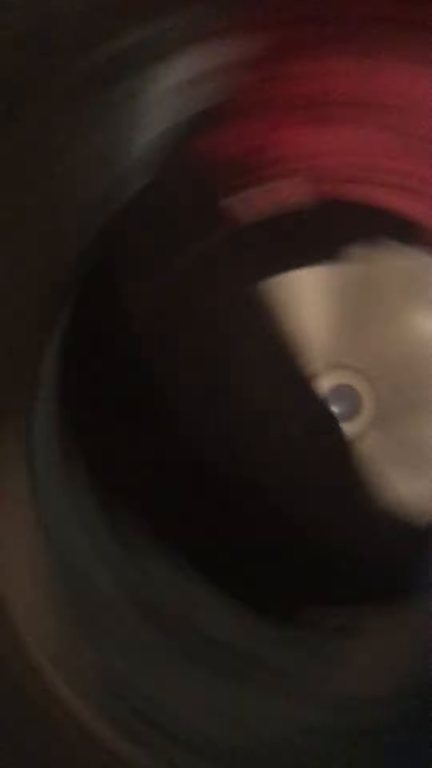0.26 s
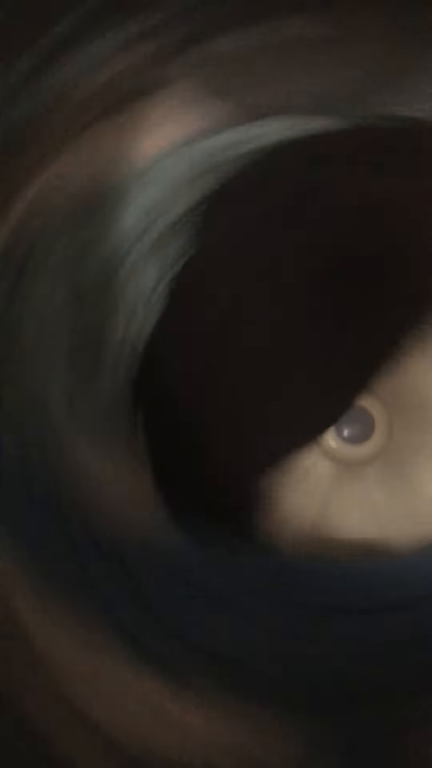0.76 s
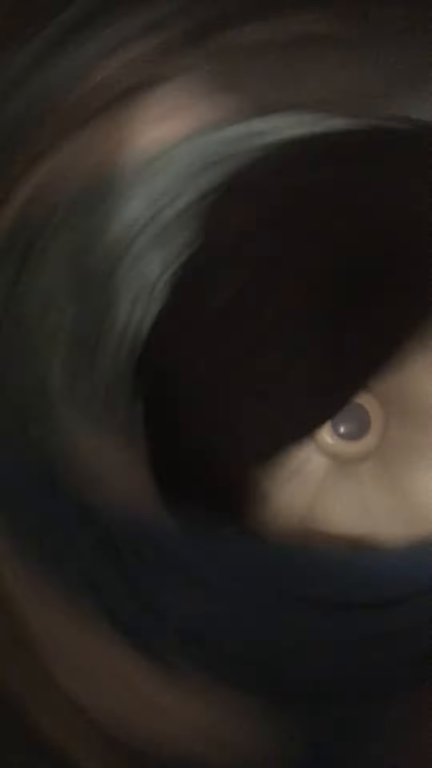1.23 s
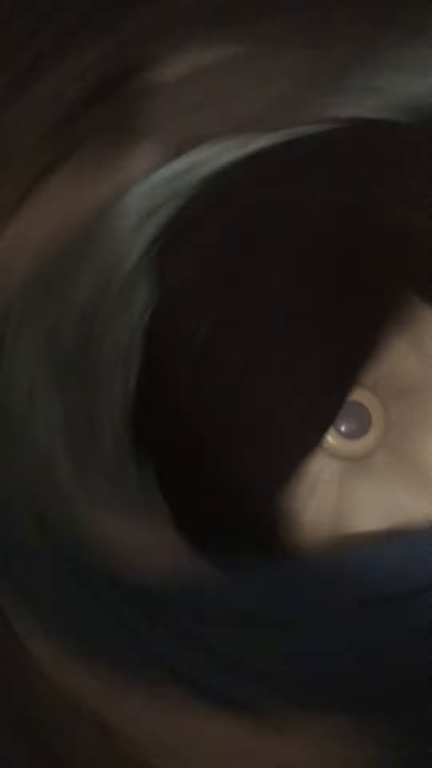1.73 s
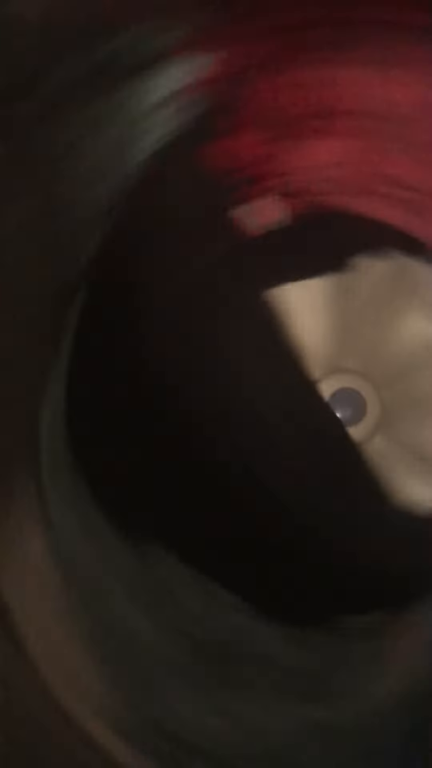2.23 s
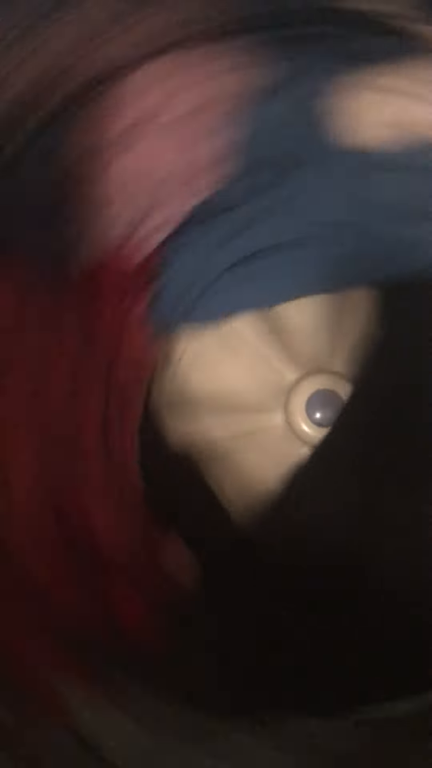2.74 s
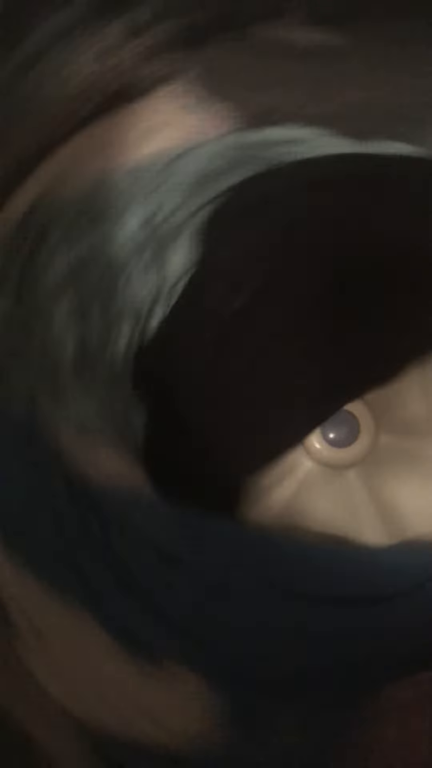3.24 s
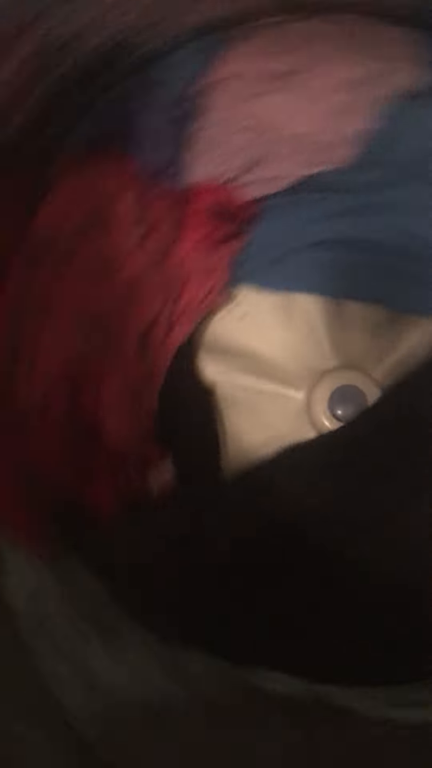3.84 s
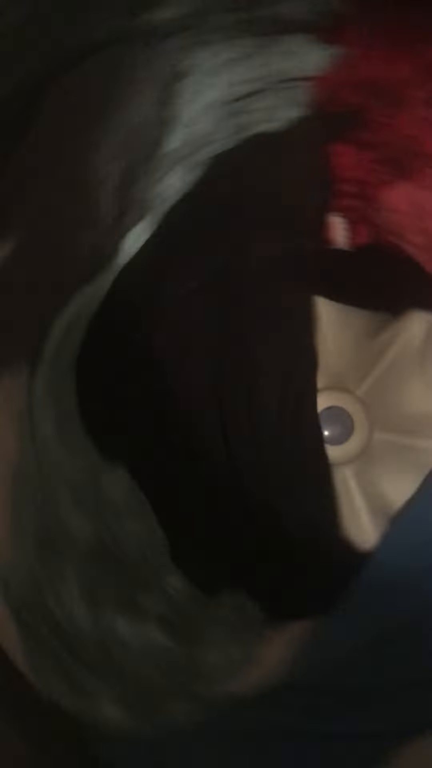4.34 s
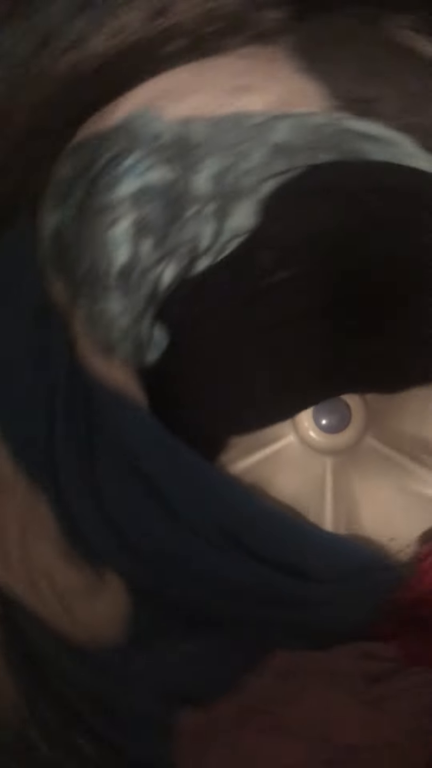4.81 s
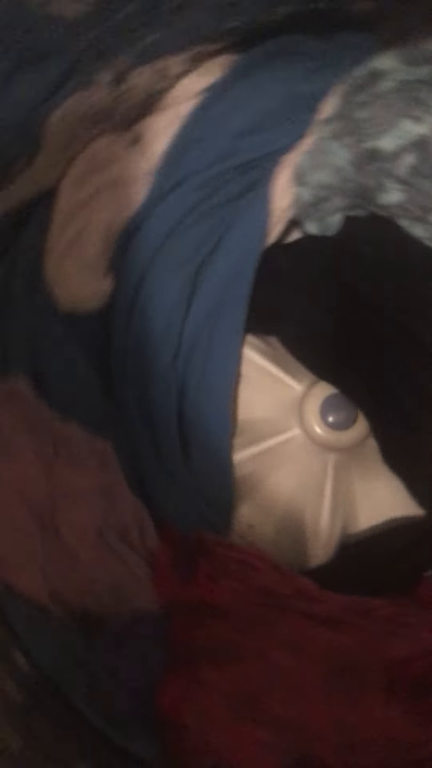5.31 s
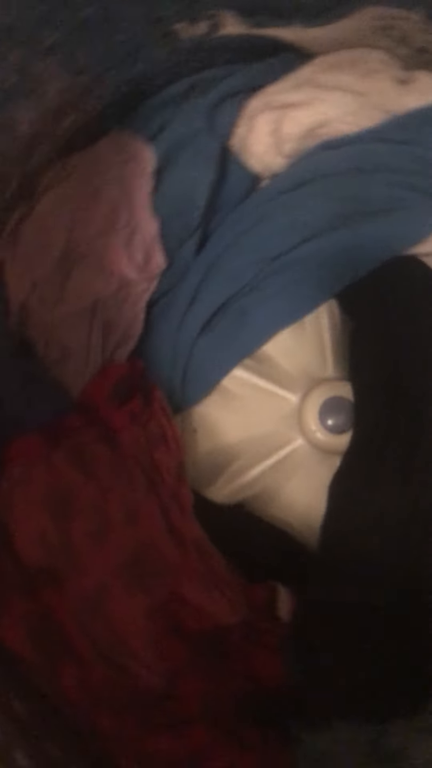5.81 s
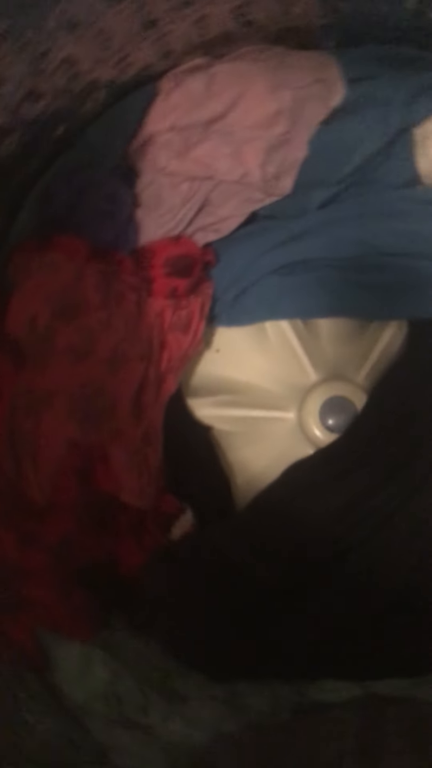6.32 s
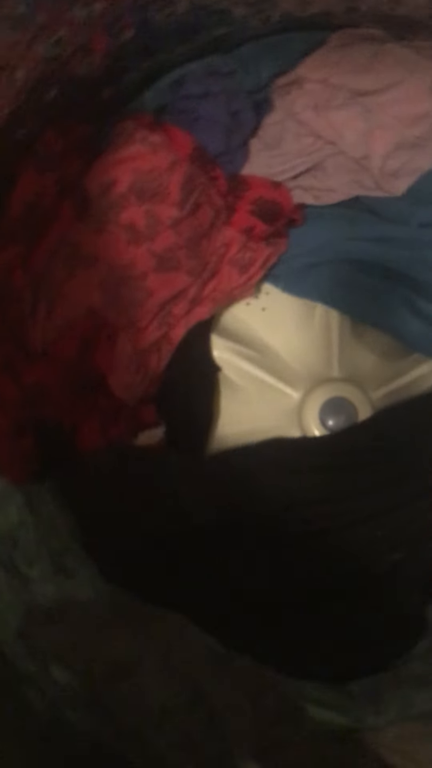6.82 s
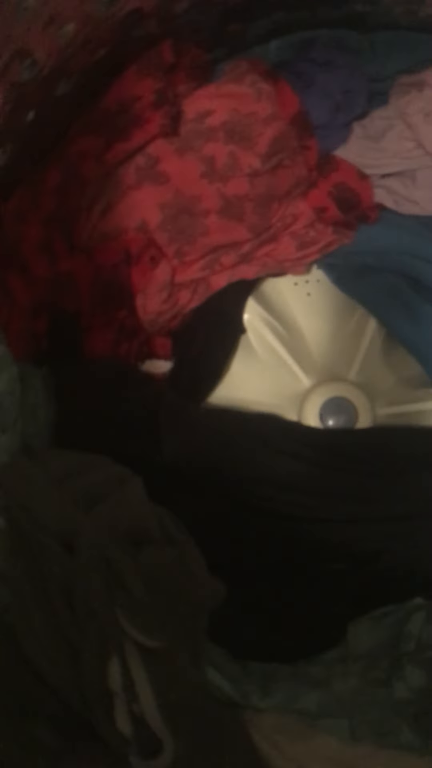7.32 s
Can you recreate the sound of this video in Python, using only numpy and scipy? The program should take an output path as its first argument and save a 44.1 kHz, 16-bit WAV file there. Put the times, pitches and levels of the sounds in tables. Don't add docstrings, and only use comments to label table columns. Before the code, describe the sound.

Close to a washing machine's door, the shaking tub rumbles and lurches while the load thuds on the cabinet and zips and buttons clatter on steel. The noise falls away within two seconds, a low groan sinks in pitch, and light bumps and taps follow. Finally cloth rustles and snaps faintly over a fast, soft motor knocking, mains hum and microphone hiss.

```python
import sys
import numpy as np
from scipy import signal
from scipy.io import wavfile
from scipy.ndimage import uniform_filter1d

SR = 44100
rng = np.random.default_rng(int(sys.argv[2]) if len(sys.argv) > 2 else 0)


def int16_out(signal):
    q = np.round(np.clip(np.atleast_2d(signal).T, -1, 1) * 32767)
    wavfile.write(sys.argv[1], SR, q.astype(np.int16))


def voltage_ratio(decibels):
    exponent = np.asarray(decibels, float) / 20
    return 10 ** exponent


N = 333396
T = np.arange(N) / SR

# (time [s], level [dB])
SHAKE_LEVEL = [(0, -40), (.2, -39.5), (.35, -34.5), (.55, -39), (.75, -35), (1.02, -40.5), (1.18, -38),
               (1.42, -44.5), (1.65, -48), (2.1, -47.5), (2.3, -50), (2.7, -50), (3.1, -55), (3.68, -48),
               (3.95, -56.5), (4.85, -56.5), (5.1, -75), (5.6, -85)]
SHAKE_MID_DB = -45
# (frequency [Hz], density [dB per Hz])
SWAY_COLOUR = [(25, -38), (45, -13), (58, -9), (66, 34), (76, -14), (90, 0), (105, -20)]
RUMBLE_COLOUR = [(53, -61), (90, -1.5), (118, -10.5), (179, -4), (290, -12), (592, -23.5), (739, -37),
                 (1000, -29), (1300, -57), (2200, -120)]
SWISH_COLOUR = [(470, -32), (800, -0.5), (1150, 1), (1310, -9.5), (1470, -5), (2040, -7), (2560, -10.5),
                (3010, -8), (5000, -26.5), (7000, -37.5), (9100, -70), (15400, -120)]
# (frequency [Hz], level [dB], decay time t60 [s])
CABINET_MODES = [(147.1, -0.5, 0.099), (180.6, -0.5, 0.18), (244.2, -5.5, 0.15), (273.7, -5, 0.17),
                 (326.9, 7.5, 0.076), (424.6, 9, 0.049), (472, 3, 0.073), (525, 14.5, 0.036),
                 (613, 11, 0.065), (666, 10, 0.058), (833, 7, 0.068)]
DRUM_MODES = [(923, 34.5, 0.008), (1180, 8, 0.11), (1450, 0.5, 0.064), (1450, 4.5, 0.016),
              (1935, -7, 0.025), (2000, 6, 0.015), (2320, -19, 0.02), (2910, -11.5, 0.032),
              (3220, -5, 0.0063), (3520, -20, 0.027), (3550, -23, 0.015), (4850, -16, 0.02),
              (6500, -21, .05)]
# (time of peak [s], level [dB], frequency [Hz], length [s])
LURCHES = [(0.07, -51, 65, 0.055), (0.277, -55, 70.5, 0.073), (0.254, -35, 130.6, 0.096),
           (0.418, -42, 64.5, 0.059), (0.428, -38.5, 120, 0.095), (0.54, -39, 64, 0.034),
           (0.59, -37.5, 128.6, 0.11), (0.633, -36, 67.3, 0.046), (0.732, -37.5, 67, 0.03),
           (0.84, -45.5, 63.4, 0.089), (0.954, -40, 68, 0.031), (1.123, -34, 126.5, 0.078),
           (1.168, -37.5, 67.7, .11), (1.405, -43, 62.3, 0.052), (1.556, -45.5, 74.7, 0.046),
           (1.745, -51, 70.4, 0.037), (2.2, -61, 66.2, 0.09), (2.743, -61, 75.7, 0.81),
           (3.258, -53, 119.9, 0.059), (3.45, -58, 67, 0.11), (3.69, -64, 65.3, .08),
           (3.913, -58, 119.6, 0.19), (4.914, -62, 66.5, .12), (5.41, -58.5, 120.6, 0.23)]
# (time [s], frequency [Hz], level [dB])
GROAN = [
    (1.75, 129.7, -68),
    (1.89, 127.4, -47),
    (2.03, 120.8, -54),
    (2.16, 117.4, -44.5),
    (2.32, 113.7, -54),
    (2.48, 106, -53),
    (2.6, 110, -64),
]
# (time [s], peak level [dB], centre frequency [Hz], contact length [s])
THUDS = [(0.009, -40.5, 170, 0.0045), (0.142, -27, 221, 0.011), (0.223, -20.5, 151, 0.025),
         (0.254, -23.5, 283, 0.029), (0.361, -43, 172, 0.015), (0.409, -28.5, 189, 0.016),
         (0.459, -24, 276, 0.0067), (0.579, -34, 144, 0.0061), (0.619, -25.5, 180, 0.024),
         (0.919, -29, 194, 0.0042), (1.069, -31, 160, 0.011), (1.103, -34, 180, 0.036),
         (1.328, -31.5, 172, 0.045), (1.347, -35, 192, 0.0057), (1.605, -37, 344, 0.0055),
         (1.719, -42, 204, 0.012)]
SLAM = [
    (.732, -26.5, 540, 0.0035),
    (0.7413, -18, 200, 0.0039),
]
BUMPS = [(2.029, -37.5, 704, 0.036), (2.128, -33, 517, 0.012), (2.359, -38.5, 360, 0.01),
         (2.459, -37.5, 108, 0.0077), (2.711, -37, 183, 0.021), (2.791, -35, 530, 0.016),
         (2.878, -36.5, 556, 0.0062), (3.095, -39, 363, 0.016), (3.292, -37.5, 650, 0.0066),
         (3.445, -36, 468, 0.0048), (3.516, -41, 196, 0.0096), (3.628, -32.5, 490, 0.02),
         (3.74, -33.5, 610, 0.012), (4.06, -35, 386, 0.0082), (4.172, -37.5, 474, 0.019),
         (4.28, -38.5, 627, 0.02), (4.573, -39.5, 465, 0.013), (4.736, -38.5, 360, 0.0097),
         (4.778, -41.5, 230, 0.028), (4.847, -43.5, 177, 0.023), (5.322, -40.5, 280, 0.028),
         (5.369, -45, 173, 0.019)]
THUD_SPREAD_HZ, BUMP_SPREAD_HZ = 213, 194
# (time [s], peak level [dB], frequency [Hz], decay time t60 [s])
BOOMS = [(.145, -34, 598, 0.15), (.225, -31.5, 430.8, 0.39), (.255, -30, 173.3, 0.17),
         (0.361, -29, 172.6, .15), (0.409, -35, 279, 0.37), (0.589, -35, 180, .2), (.66, -30.5, 180, 0.12),
         (0.691, -34, 247.5, 0.22), (0.739, -24, 167, 0.094), (.742, -29, 325.4, 0.18),
         (.83, -34.5, 159, .15), (0.901, -33, 179.7, .2), (1.059, -38.5, 250, 0.21),
         (1.103, -33, 525, 0.077), (1.115, -34.5, 638, 0.14), (1.1, -28, 178.8, 0.49),
         (1.2, -40.5, 174.6, 0.64), (1.311, -38.5, 444, 0.19), (1.328, -26.5, 180.8, 0.19),
         (1.335, -31.5, 591, 0.04), (1.559, -40, 203, 0.17), (3.446, -34, 476, 0.075),
         (3.628, -39, 537, 0.12), (4.172, -38.5, 490, 0.1), (4.574, -36.5, 478, 0.037),
         (3.65, -45, 306, 0.44), (5.33, -47.5, 169.4, 0.55)]
PINGS = [
    (.437, -41.5, 3030, 0.083),
    (0.94, -43, 1450, .04),
    (.6, -47.5, 3690, 0.03),
]
# (time [s], peak level [dB], centre frequency [Hz], contact length [s], splash peak level [dB])
CLACKS = [
    (0.2228, -27.5, 2080, 0.024, -47),
    (1.086, -42.5, 3860, 0.008, -72),
    (1.196, -48, 2660, 0.028, -69),
    (1.288, -59, 2160, 0.0073, -57),
    (1.772, -35.5, 1430, 0.026, -63),
    (1.886, -41.5, 2580, 0.03, -56),
    (1.912, -40, 2900, 0.0034, -59),
    (2.013, -28, 1500, 0.019, -48.5),
]
# (time [s], peak level [dB], centre frequency [Hz], contact length [s])
RATTLES = [(0.136, -33.5, 1170, 0.035), (0.209, -39, 1760, 0.0035), (0.263, -41.5, 3160, 0.06),
           (0.409, -42, 1180, 0.0063), (0.444, -42, 1000, 0.095), (0.595, -33.5, 1160, 0.01),
           (0.695, -50, 2900, 0.014), (0.894, -44, 1220, 0.0095), (1.069, -41.5, 1450, 0.012),
           (1.098, -35.5, 1500, 0.0074), (1.129, -30, 960, 0.0071), (1.241, -36, 1560, 0.025),
           (1.322, -33, 1200, 0.0047), (1.453, -40.5, 1960, 0.02), (1.713, -49, 950, 0.0033),
           (2.024, -29, 1640, 0.016), (2.113, -38.5, 1190, 0.025), (2.348, -48.5, 1950, 0.028),
           (3.089, -48.5, 1760, 0.022), (3.513, -48, 2680, 0.018)]
JINGLES = [(0.235, -33, 3140, 0.0023), (0.38, -52, 2560, 0.0089), (0.438, -52, 3030, 0.0035),
           (0.565, -62, 3120, 0.018), (0.612, -45, 3230, 0.007), (0.667, -49, 2800, 0.021),
           (0.725, -44, 1420, 0.015), (0.864, -49, 2790, 0.014), (1.022, -45.5, 3050, 0.01),
           (1.024, -38, 1450, 0.0071), (1.13, -41.5, 2840, 0.0019), (1.253, -50, 3100, 0.013),
           (1.306, -49, 2460, 0.006), (1.518, -51, 1860, 0.02), (1.876, -54, 4200, 0.01),
           (2.038, -43, 2400, 0.031), (3.988, -51, 1820, .007)]
# (time [s], peak level [dB], contact length [s])
TAPS = [(2.716, -48, 0.01), (2.79, -49, 0.005), (2.884, -65, 0.007), (3.027, -57, 0.0086),
        (3.286, -55, 0.006), (3.447, -42, 0.0036), (3.626, -42.5, 0.023), (3.737, -50, 0.0091),
        (3.942, -50.5, 0.013), (4.066, -46.5, 0.0081), (4.168, -50, 0.015), (4.284, -50, 0.0065),
        (4.572, -56, 0.0059), (4.734, -47, 0.0034), (4.782, -43, 0.0031), (5.324, -49, 0.0086)]
# (frequency [Hz], level [dB], decay time t60 [s])
WALL_MODES = [(930, -5, 0.071), (1125, -8.5, 0.098), (1450, -12.5, 0.068), (1667, -13, 0.053),
              (1845, 1.5, 0.011), (2075, -4, 0.016), (2439, -37, 0.019), (2995, -5, 0.025),
              (3246, -2.5, 0.015), (3550, -6, 0.021), (4520, -17, 0.012)]
# (time [s], peak level [dB], centre frequency [Hz], range [octaves])
STRIKES = [(.053, -47, 970, 0.95), (0.136, -28, 2000, 0.59), (0.138, -26.5, 1000, 1),
           (0.217, -30.5, 2500, 1), (0.227, -17, 3300, 0.63), (0.23, -14.5, 1990, 1),
           (0.238, -35, 3020, 0.43), (.25, -40, 3060, 0.4), (0.259, -44, 3000, 0.45),
           (0.266, -36, 1950, 0.33), (0.283, -41, 3200, .5), (0.409, -51, 3020, 0.5),
           (0.439, -51, 2930, 0.11), (0.446, -37.5, 1010, 1), (0.465, -50, 1790, 0.36),
           (.51, -51, 2000, 0.33), (0.549, -50, 910, 0.24), (0.579, -40, 1800, 0.5),
           (0.598, -28, 1550, 0.52), (0.611, -31.5, 1060, 0.41), (0.616, -40, 2980, 0.41),
           (.676, -57, 2900, .2), (0.702, -48, 3100, .4), (.889, -49, 980, 0.45), (0.909, -46, 2130, 0.53),
           (1.029, -39, 1450, 0.14), (1.038, -45, 1450, 0.13), (1.064, -36.5, 1520, 0.51),
           (1.103, -36, 890, 0.39), (1.134, -39, 2570, 1), (1.243, -41, 1320, 0.22), (1.262, -52, 2520, .7),
           (1.323, -50, 930, 0.48), (1.331, -42, 2440, 0.14), (1.4587, -50, 3560, .5),
           (1.466, -40.5, 1660, 0.32), (1.781, -37, 840, 0.37), (1.9005, -48, 2000, 0.93),
           (1.908, -45, 2500, 0.96), (2.024, -39, 1860, .8), (2.031, -28, 1575, 0.16),
           (2.039, -33, 1550, 0.33), (2.788, -46, 1100, 0.65), (2.881, -52, 1020, 0.55),
           (3.298, -47.5, 980, 0.85), (3.443, -42, 1120, 0.53), (3.629, -42.5, 1000, 0.35),
           (3.742, -54, 1900, .4), (4.065, -58, 1110, 1), (4.285, -45, 1100, 0.97),
           (4.777, -61, 1800, 0.72), (5.325, -49.5, 1050, 0.36),
           (2.3545, -49, 1930, 0.59), (2.7085, -52, 1020, 0.6), (2.9002, -70, 1070, 0.66),
                  (3.0344, -49, 1150, 1), (3.0913, -49, 1900, 0.48), (3.156, -52, 1100, 0.68),
                  (3.2923, -55, 1140, 0.6), (3.441, -58, 1180, 0.6), (3.514, -50, 3030, 0.6),
                  (3.6264, -55, 1110, 0.73), (3.74, -49, 1150, 0.55), (3.9005, -52, 2910, 0.6),
                  (3.9194, -56, 1060, 0.6), (3.9422, -52, 1090, 0.72), (3.9948, -53, 1790, 0.33),
                  (4.0227, -51, 2140, 0.34), (4.0616, -49, 1220, 0.65), (4.2797, -54, 1150, 0.6),
                  (4.706, -58, 2940, 0.4), (4.732, -59, 1920, 0.4), (4.7772, -46, 1100, 0.49),
                  (4.9007, -56, 3200, 0.3), (4.918, -55, 2800, .3), (4.685, -61, 2290, .2),
                  (5.3234, -58, 1100, 0.6)]
# (time [s], peak level [dB])
CLOTH_TICKS = [
    (4.9453, -40),
    (4.9478, -43),
    (4.9558, -40),
    (4.9587, -41),
]
# (time [s], peak level [dB], frequency [Hz])
CRACKLES = [
    (5.322, -47, 2570),
    (5.7004, -51, 3600),
    (5.9094, -52, 3000),
    (6.139, -50, 3100),
    (6.2077, -47, 3030),
    (6.345, -50, 3000),
    (6.651, -49, 3080),
    (6.701, -43, 3020),
    (6.7537, -53, 3150),
    (7.2655, -52, 3220),
]
# (time [s], peak level [dB], length [s])
CRACK = (0.21, -50.5, 0.014)
# (time [s], level [dB], fade rate [dB per s])
PEELS = [
    (5.2, -73.5, 29),
    (5.7, -69, 25),
    (6.68, -75, 148),
    (6.84, -66, 290),
    (6.98, -73, 47),
]
# (frequency [Hz], density [dB per Hz])
CLOTH_COLOUR = [(880, -51), (1500, -8), (1820, -19), (2240, -4), (2840, -9.5), (3080, -5.5), (5000, -18),
                (6500, -42), (11000, -120)]
# (frequency [Hz], level [dB], decay time t60 [s], first movement [+1 out, -1 in])
KNOCK_MODES = [(217.2, -4, 0.092, -1), (267.6, -28, 0.73, -1), (319.2, -4.5, 0.064, -1),
               (344.5, -9.5, 0.11, -1), (418, -4, 0.037, -1), (468, -10, 0.055, 1), (569, 1.5, 0.026, 1),
               (611, -12.5, 0.19, -1), (677.4, -20, 0.18, 1), (727, -20.5, 0.11, -1),
               (761.5, -22, 0.072, -1), (781, -28.5, 0.2, -1), (910, -39, 0.12, 1)]
# (frequency [Hz], density [dB per Hz])
AIR_COLOUR = [(12, -54), (20, -33), (65, -13.5), (112, -11), (163, -10.5), (215, -7.5), (495, -12),
              (602, -14), (1000, -35.5), (1300, -91), (2200, -120)]
WHIRR_COLOUR = [(530, -37), (900, -8.5), (1480, -9), (1740, -11), (2110, -4.5), (2480, -6), (3570, -8),
                (5000, -29), (6500, -67), (11000, -120)]
HISS_COLOUR = [(2710, -21), (4600, 3.5), (5050, -10), (5370, -1.5), (6900, 1), (8090, -3), (9480, 3.5),
               (10500, -2), (13400, 2.5), (15100, 1), (16000, -3)]
# (time [s], level [dB])
WAKE = [
    (0, -34),
    (.22, -23),
    (.3, -21),
    (.45, -19),
    (.6, -11),
    (2.3, -9.5),
    (2.4, -7.5),
    (2.55, -10),
    (7.6, -11),
]


def evened(x):
    return x / np.sqrt(np.mean(x ** 2) + 1e-20)


def peaked(x, db):
    return voltage_ratio(db) * x / abs(x).max()


def add(mix, s, sound):
    part = mix[round(s * SR):][:len(sound)]
    part += sound[:len(part)]


def band(x, lo_hz, hi_hz, order=2):
    return signal.sosfilt(signal.butter(order, [lo_hz, hi_hz], "band", fs=SR, output="sos"), x)


def noise(colour, patchy_db):
    hz = np.fft.rfftfreq(2048, 1 / SR)
    colour_hz, colour_level = np.transpose(colour)
    real, imaginary, patches = rng.standard_normal((N // 512 + 5, 1025, 3)).T
    patches = uniform_filter1d(patches, size=12, axis=0)
    patches = evened(uniform_filter1d(patches, size=4, axis=1))
    colour_db = np.interp(np.log(hz + 1), np.log(colour_hz + 1), colour_level, -100, -100)
    spectra = (real + 1j * imaginary) * voltage_ratio(colour_db[:, None] + patchy_db * patches)
    return evened(signal.istft(spectra, nperseg=2048, noverlap=1536)[1][:N])


def ring(modes, centre_hz=500, octaves=99, lag_turns=0, rise_turns=0.38):
    hz, db, t60, *given = np.transpose(modes)[:, :, None]
    t = np.arange(0, min(1.6 * t60.max(), 1 / 4), 1 / SR)
    t = np.maximum(t - lag_turns * (1 / hz - 1 / hz.max()), 0)
    favour_db = -6 * (np.log2(hz / centre_hz) / octaves) ** 2
    decay_db = -60 * t / np.maximum(t60, .01)
    sign = np.sign(given[0]) if given else (-1) ** np.arange(len(hz))[:, None]
    rise = 1 - np.exp(-t * hz / rise_turns)
    return (sign * voltage_ratio(db + favour_db + decay_db) * rise * np.sin(2 * np.pi * hz * t)).sum(0)


def contact(length, rise=0.023, first=6.4, uneven=0.19):
    u = np.arange(3000) / SR / np.clip(length, .0005, .03)
    burst = rng.standard_normal(3000) * rng.exponential(1, 3000) ** uneven
    burst = burst * (1 - np.exp(-u / rise)) * np.exp(-u)
    burst[0] = first * np.sqrt(length * SR / 20)
    return burst


def wake_db(t):
    return np.interp(t, *np.transpose(WAKE))


def shake_db():
    return np.interp(T, *np.transpose(SHAKE_LEVEL))


def tub_sway():
    level_db = -61 + 1 * (shake_db() - SHAKE_MID_DB)
    return band(voltage_ratio(level_db) * noise(SWAY_COLOUR, 2.5), 39, 140, order=3)


def cabinet_rumble():
    rumble = noise(RUMBLE_COLOUR, 2.57)
    panels = evened(signal.oaconvolve(rumble, ring(CABINET_MODES))[:N])
    return voltage_ratio(shake_db()) * evened(.5 * rumble + panels)


def drum_swish():
    swish = noise(SWISH_COLOUR, 1.2)
    knocks = (rng.random(N) < 110 / SR) * np.minimum(rng.exponential(1, N), 2.2)
    flare = signal.lfilter([1], [1, -np.exp(-1 / (0.009 * SR))], knocks)
    swish = swish * (1 + 0.8 * flare)
    swish = evened(5.1 * swish + evened(signal.oaconvolve(swish, ring(DRUM_MODES))[:N]))
    return voltage_ratio(-61.5 + 0.44 * (shake_db() - SHAKE_MID_DB)) * swish


def shake():
    stop = voltage_ratio(-15 * np.maximum(T - SHAKE_LEVEL[-1][0], 0))
    return stop * (tub_sway() + cabinet_rumble() + drum_swish())


def lurches():
    out = np.zeros(N)
    for s, db, hz, length in LURCHES:
        near = abs(T - s) < 2 * length
        swell = np.exp(-(2 * (T[near] - s) / length) ** 2)
        cycles = np.sin(2 * np.pi * (hz * T[near] + rng.random()))
        out[near] += voltage_ratio(db) * np.sqrt(2) * swell * cycles
    return out


def groan():
    s, hz, db = np.transpose(GROAN)
    waver = 0.42 * evened(uniform_filter1d(rng.standard_normal(N), size=1500))
    turns = np.cumsum(np.interp(T, s, hz)) / SR
    return voltage_ratio(np.interp(T, s, db, -120, -120)) * np.sqrt(2) * np.sin(2 * np.pi * turns + waver)


def thuds():
    out = np.zeros(N)
    for blows, spread_hz in (THUDS + SLAM, THUD_SPREAD_HZ), (BUMPS, BUMP_SPREAD_HZ):
        for s, db, hz, length in blows:
            octaves = np.clip(np.log2(1 + spread_hz / hz), .2, 2)
            body = ring(CABINET_MODES + [(hz, -2, .08)], hz, octaves)
            blow = signal.oaconvolve(contact(length, first=1.1, uneven=0.12), body)
            add(out, s, peaked(blow, db))
    return out


def booms():
    out = np.zeros(N)
    for s, db, hz, t60 in BOOMS + PINGS:
        tone = ring([(hz, 0, t60)], rise_turns=0.62)
        fade = np.cos(np.linspace(0, np.pi / 2, len(tone)))
        add(out, s, peaked(tone * fade, db))
    return out


def rattle(s, db, hz, length, octaves, splash_db=None, first=1.0):
    if splash_db is None:
        splash_db = -65.5 + 0.13 * (db - SHAKE_MID_DB) + wake_db(s) + 9.0
    hit = contact(length, rise=.3, first=first, uneven=.9)
    octaves = np.clip(octaves, .15, 1.5)
    top_hz = max(4200, 1.25 * hz)
    rung = signal.oaconvolve(hit, ring(DRUM_MODES + [(hz, 3, .03)], hz, octaves))
    out = peaked(band(rung, 500, top_hz, order=3), db - 9)
    direct = band(hit, hz / 2 ** octaves, min(hz * 2 ** octaves, top_hz), order=3)
    add(out, 0, peaked(direct, db - 1))
    hit = hit * np.minimum(np.arange(len(hit)) / (length * SR / 4), 1)
    air_gain = 0.18 * voltage_ratio(wake_db(s) + 12.5)
    splash = band(hit, 2250, 6300, order=3) + air_gain * band(hit, 2900, 16800, order=4)
    add(out, 0, peaked(splash, splash_db + 5.5))
    return out


def rattles():
    out = np.zeros(N)
    wide, thin = 0.88, 0.33
    for s, db, hz, length, splash_db in CLACKS:
        add(out, s, rattle(s, db, hz, length, wide, splash_db, first=.25))
    for s, db, hz, length in RATTLES:
        add(out, s, rattle(s, db, hz, length, wide))
    for s, db, length in TAPS:
        add(out, s, rattle(s, db, 1110, length, wide))
    for s, db, hz, length in JINGLES:
        add(out, s, rattle(s, db, hz, length, thin))
    return out


def strikes():
    out = np.zeros(N)
    for s, db, hz, octaves in STRIKES:
        blow = ring(WALL_MODES + [(hz, -6, .02)], hz, np.clip(octaves, .1, 1.5), rise_turns=1.0)
        add(out, s, peaked(blow, db))
    return out


def hollow(x, t60=0.14, wet_db=-7):
    t = np.arange(SR // 4) / SR
    echoes = rng.choice([-1., 1.], len(t)) * (rng.random(len(t)) < .05)
    tail = echoes * voltage_ratio(-60 * t / t60) * (t > .003)
    return x + voltage_ratio(wet_db) * signal.oaconvolve(x, tail / np.linalg.norm(tail))[:N]


def cloth_snaps():
    out = np.zeros(N)
    for s, db in CLOTH_TICKS:
        u = np.arange(-20, 200) / SR / .00007
        pulse = -u * np.exp(-u ** 2 / 2)
        add(out, s - 20 / SR, peaked(band(pulse, 700, 4100, order=5), db))
    for s, db, hz in CRACKLES:
        snap = band(contact(.006, first=1.5), hz * .88, hz * 1.2)
        add(out, s, peaked(snap, db - 9))
    s, db, length = CRACK
    add(out, s, peaked(band(contact(length, first=1.0, uneven=0.43), 4500, 18000), db))
    return out


def fibre_sparks():
    sparks = (rng.random(N) < 60 / SR) * np.minimum(rng.exponential(1, N), 2.5)
    sparks = signal.lfilter([1], [1, -np.exp(-1 / (.0015 * SR))], sparks)
    sparks = sparks * rng.standard_normal(N)
    return voltage_ratio(-73) * (T > 4.6) * band(sparks, 2000, 15000)


def cloth_peel():
    peel = np.zeros(N)
    for s, db, fade_db in PEELS:
        rise = np.clip((T - s) / 0.011, 0, 1)
        peel += rise * voltage_ratio(db - fade_db * np.maximum(T - s, 0))
    return voltage_ratio(0.5) * peel * noise(CLOTH_COLOUR, 1.5)


def motor_knocks():
    knocks_per_s, first_knock_s = 14.996, .04695
    at = np.arange(first_knock_s * SR, N - 1, SR / knocks_per_s).round().astype(int)
    train = np.zeros(N)
    train[at] = voltage_ratio(0.32 * rng.standard_normal(len(at)))
    knocks = signal.oaconvolve(train, ring(KNOCK_MODES, lag_turns=1.15, rise_turns=4.0))[:N]
    return voltage_ratio(-53) * evened(knocks)


def motor_hum():
    wobble = 0.13 * evened(uniform_filter1d(rng.standard_normal(N), size=3000))
    return voltage_ratio(-61.5) * np.sqrt(2) * np.sin(2 * np.pi * 119.97 * T + wobble)


def still_room():
    return voltage_ratio(-59.5) * noise(AIR_COLOUR, 0.96) + voltage_ratio(-73) * noise(WHIRR_COLOUR, 2.1)


def microphone_hiss():
    return voltage_ratio(-63.5 + wake_db(T)) * noise(HISS_COLOUR, 0.33)


def scene():
    machine = shake() + lurches() + groan() + thuds() + booms()
    drum = hollow(rattles() + strikes())
    cloth = cloth_snaps() + fibre_sparks() + cloth_peel()
    motor = motor_knocks() + motor_hum()
    return (machine + drum + cloth + motor + still_room())[None]


def band_limit(x):
    return signal.sosfilt(signal.butter(12, 15830, fs=SR, output="sos"), x)


def record(dry):
    limited = signal.sosfilt(signal.cheby2(12, 60, 16250, fs=SR, output="sos"), dry)
    return band_limit(limited + microphone_hiss())


dry = scene()
out = record(dry)
int16_out(out)
```